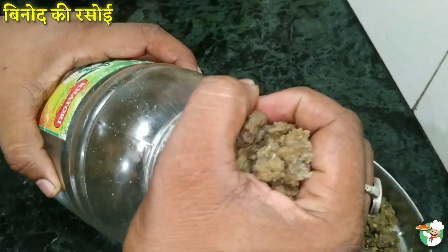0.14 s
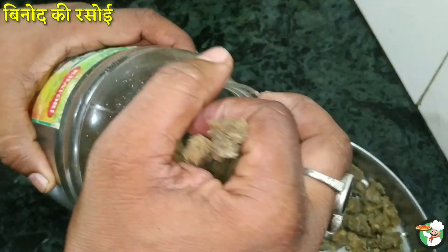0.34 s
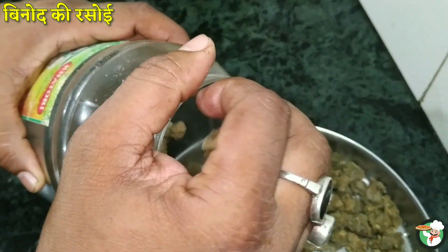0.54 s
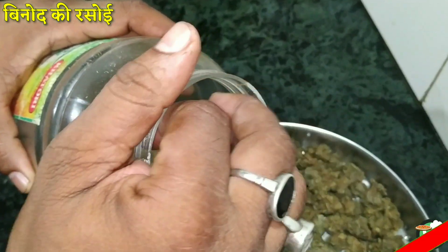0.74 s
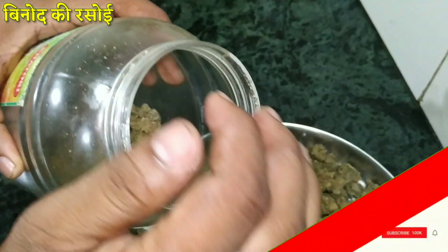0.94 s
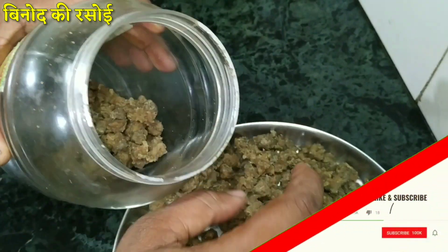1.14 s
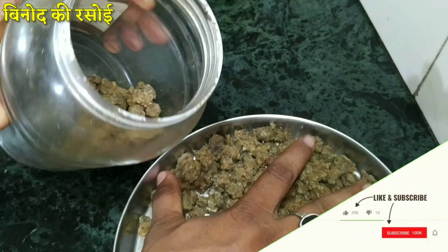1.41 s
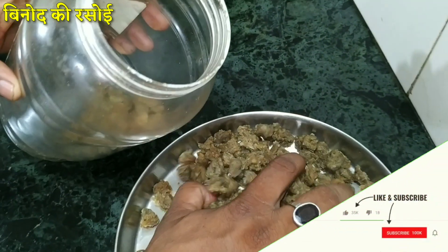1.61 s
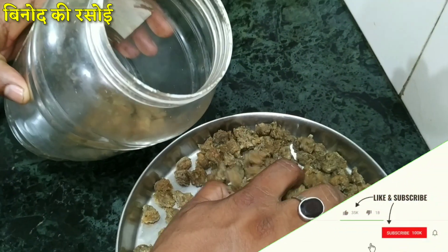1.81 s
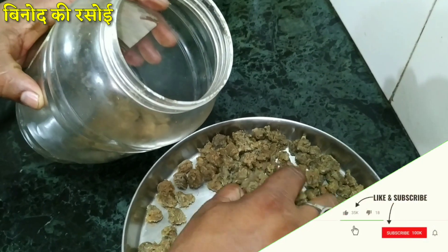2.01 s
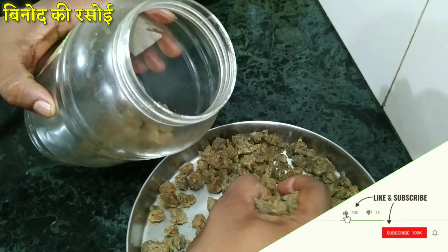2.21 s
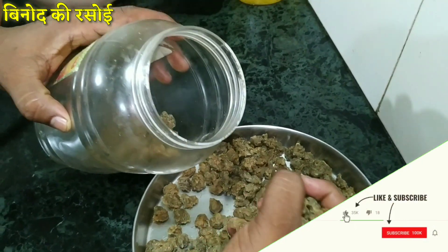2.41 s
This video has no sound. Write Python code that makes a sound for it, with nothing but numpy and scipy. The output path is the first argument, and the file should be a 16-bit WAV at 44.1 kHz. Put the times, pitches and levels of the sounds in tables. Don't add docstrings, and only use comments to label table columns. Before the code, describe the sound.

Dry hard pieces clatter into a hollow plastic jar, then rattle brightly on a steel plate

```python
import sys
import numpy as np
from scipy import signal
from scipy.fft import rfft, irfft, next_fast_len
from scipy.io import wavfile
from scipy.ndimage import uniform_filter1d

SR = 44100
rng = np.random.default_rng(int(sys.argv[2]) if len(sys.argv) > 2 else 0)


def gain_from_db(level_db):
    decades = np.asarray(level_db, float) / 20
    return 10 ** decades


def transcribe(u):
    v = np.clip(np.atleast_2d(u).T, -1, 1)
    q = np.round(v * 32767).astype(np.int16)
    wavfile.write(sys.argv[1], SR, q)


N = 112454

JAR_LAG_S, PLATE_LAG_S, LAG_SPREAD_S = -.00023, .00007, .00015
JAR_RISE_S, PLATE_RISE_S = .0002, .0015
MEAN_BRIGHT_DB, SMALL_BRIGHT_DB = -17.5, 1.5


def rms_one(x):
    return x / np.sqrt(np.mean(x ** 2) + 1e-20)


def in_time(curves):
    t = np.arange(N) / SR
    levels = [np.interp(t, *np.transpose(rows), left=-120, right=-120) for rows in curves]
    return np.max(levels, axis=0)


def at_hz(points, hz):
    point_hz, point_db = np.transpose(points)
    return np.interp(np.log(hz), np.log(point_hz), point_db)


def ring(clicks, hz, t60):
    radius = gain_from_db(-60 / (t60 * SR))
    angle = 2 * np.pi * hz / SR
    return signal.lfilter([0, np.sin(angle)], [1, -2 * radius * np.cos(angle), radius ** 2], clicks + 1e-18)


def place(s, gain, pan_db, lag_s):
    out = np.zeros((2, N))
    for ch, sign in enumerate((1, -1)):
        at = ((s + sign * lag_s / 2) * SR).astype(int)
        np.add.at(out[ch], np.clip(at, 0, N - 1), gain * gain_from_db(sign * pan_db / 2))
    return out


def flurries(s, db, rise_s, burst_s, count=48):
    burst_s = np.clip(burst_s, .002, .04)[:, None]
    late = 2.7 * burst_s * rng.random((len(s), count)) ** 1.8
    gain = gain_from_db(db)[:, None] * np.exp(-late / burst_s) * (1 - np.exp(-late / rise_s))
    owner = np.repeat(np.arange(len(s)), count)
    return (s[:, None] + late).ravel(), gain.ravel(), owner


def crowd(level_db, per_s, spread_db):
    born = rng.random(N) < per_s / SR
    sizes = gain_from_db(spread_db * np.minimum(rng.exponential(1, N), 4)) * rng.choice([-1, 1], N)
    at = np.flatnonzero(born)
    return at / SR, rms_one(sizes * born)[at] * gain_from_db(level_db[at])


def crowd_groups(s):
    return 40 + (s * 50).astype(int)


def body(s, gain, bright_db, low_db, group, pan_db, lag_s, colour, cycles, count=64):
    pitches = np.geomspace(520, 15500, count) * rng.uniform(.985, 1.015, count)
    lags = lag_s + LAG_SPREAD_S * rng.standard_normal(200)[group]
    patch_db = 1.4 * rms_one(uniform_filter1d(rng.standard_normal((200, count)), size=4, axis=1))
    t60 = cycles / pitches + .009
    weights = gain_from_db(at_hz(colour, pitches)) * np.sqrt(pitches / t60)
    weights = weights / np.sqrt(np.sum(weights ** 2 * t60) * SR / 27.6)
    out = 0
    for k, hz in enumerate(pitches):
        treble_db = bright_db * np.clip(np.log2(hz / 2500), 0, 1)
        bass_db = low_db * np.clip(2 * np.log2(1800 / hz), 0, 1)
        strike = gain * gain_from_db(treble_db + bass_db + patch_db[group, k]) * rng.standard_normal(len(s))
        out = out + ring(place(s, weights[k] * strike, pan_db, lags), hz, t60[k])
    return out


def snaps(rows, pan_db, lag_s, count=300):
    s, db, bright_db = np.transpose(rows)[:, :, None]
    late = np.arange(count) / SR
    envelope = np.exp(-late / .0019) * (1 - np.exp(-late / (2 * JAR_RISE_S)))
    crack = rng.standard_normal((len(s), count)) * envelope
    lags = lag_s + LAG_SPREAD_S * rng.standard_normal(s.shape)
    out = 0
    for band_hz, band_db in (([1350, 3200], db + 4.5), ([3200, 7200], db + bright_db + 7)):
        band = signal.butter(2, band_hz, "band", fs=SR, output="sos")
        out = out + signal.sosfilt(band, place(s + late, crack * gain_from_db(band_db), pan_db, lags))
    return out


def low_cut(x, hz):
    return signal.sosfilt(signal.butter(6, hz, "high", fs=SR, output="sos"), x)


def uncovered(s, before_db, after_db):
    hand_off_s, hand_move_s = 0.92, .04
    return before_db + (after_db - before_db) * (.5 + .5 * np.tanh((s - hand_off_s) / hand_move_s))


def tumbling():
    # time in seconds, level in dB.
    pour = [
        [(.205, -22.5), (.28, -16), (.35, -14), (.52, -15.5), (.63, -20), (.69, -21)],
        [(.69, -24.5), (.79, -28.5), (.88, -26.5), (.95, -24), (1.0, -40), (1.1, -39), (1.2, -60)],
    ]
    return crowd(in_time(pour) - 3.5, per_s=1500, spread_db=3.0)


def jar_wall(tumble_s, tumble_gain):
    # start in seconds, peak in dB, brightness in dB, body in dB.
    landings = [(0.2063, -2.5, -19, -25), (0.2279, -6.5, -16, -18), (0.2483, -2, -29, -12),
                (0.2638, -2.5, -22.5, -22), (0.272, -0.5, -19, -15.5), (0.2992, -7, -13, -27),
                (0.347, -3, -18, -16), (0.3654, -7, -11, -18), (0.4038, 0, -19, -25),
                (0.4179, -3, -16, -25), (0.4484, -8.5, -24, -10), (0.4684, 0, -18.5, -32),
                (0.5401, 1, -14.5, -22), (0.5969, -3.5, -12.5, -20.5), (0.64, -2, -9, -24),
                (0.6564, -14, -25, -13), (0.7067, -6.5, -12, -31), (0.724, -3.5, -16, -24),
                (0.7766, -8.5, -19, -19.5), (0.8049, -3.5, -10.5, -21), (0.8316, -8, -14, -27),
                (0.8999, -9.5, -9, -10), (0.9325, -21.5, -6, -14), (0.9724, -25, -8.5, -10),
                (1.0122, -18, -15.5, -19), (1.0643, -13, -16, -17), (1.1253, -22, -28, -18.5),
                (1.198, -23.5, -23, -27), (1.254, -15, -14, -11)]
    # frequency in Hz, level in dB per Hz.
    wall_colour = [(500, -16), (561, -21.5), (941, -10), (1670, -9.5), (2230, -4.5), (3060, -12),
                   (4000, -9), (5350, -18.5), (15500, -47.5)]
    s, db, bright_db, low_db = np.transpose(landings)
    land_s, land_gain, owner = flurries(s, db + 5, JAR_RISE_S, np.full(len(s), .0055))
    small = np.zeros(len(tumble_s))
    all_s = np.r_[land_s, tumble_s]
    return body(all_s, np.r_[land_gain, tumble_gain],
                bright_db=np.r_[bright_db[owner] - MEAN_BRIGHT_DB, small + SMALL_BRIGHT_DB],
                low_db=np.r_[low_db[owner] + 19.5, small],
                group=np.r_[owner, crowd_groups(tumble_s)],
                pan_db=uncovered(all_s, -1.3, 2), lag_s=JAR_LAG_S, colour=wall_colour, cycles=39)


def jar_boom(tumble_s, tumble_gain):
    # start in seconds, peak in dB, upper modes in dB.
    thumps = [(0.207, -34, 11.5), (0.28, -19, -1), (0.346, -3.5, -9), (0.375, -9.5, -9.5),
              (0.434, -11, -16), (0.469, -13.5, -10), (0.51, -18.5, -1), (0.544, -16.5, 1),
              (0.59, -14.5, -5.5), (0.632, -16, 0.5), (0.699, -28.5, 14), (0.773, -26.5, 6),
              (0.87, -29, -17), (0.935, -8.5, -9.5), (0.969, -13, -14), (1.017, -15.5, -9.5),
              (1.063, -20, 2), (1.257, -28.5, -26)]
    # frequency in Hz, level in dB, t60 in seconds.
    low_modes = [(192, -14, 0.43), (239, -3, 0.11), (282, -15, 0.084), (391, -6, 0.033), (507, -16, 0.071),
                 (708, -12.5, 0.051), (948, -10, 0.042), (1140, -35, 0.038), (1260, -34, 0.097),
                 (1496, -20, 0.067), (1798, -9.5, 0.05)]
    thump_s, thump_db, upper_db = np.transpose(thumps)
    all_s = np.r_[thump_s, tumble_s]
    pan_db = uncovered(all_s, -3, 0)
    filling = np.clip(10 * (tumble_s - 0.23), .1, 1)
    out = 0
    for hz, db, t60 in low_modes:
        mode_db = (upper_db + 5.5 + 1.85 * rng.standard_normal(len(thump_s))) * (hz > 330)
        thump = gain_from_db(thump_db + 2.5 + mode_db)
        stir = tumble_gain * gain_from_db(-23) * filling * rng.standard_normal(len(tumble_s))
        out = out + gain_from_db(db) * ring(place(all_s, np.r_[thump, stir], pan_db, JAR_LAG_S), hz, t60)
    return out


def jar_cracks():
    # start in seconds, peak in dB, brightness in dB.
    wall_snaps = [(0.2072, -7.5, -17), (0.2174, -12, -28), (0.2284, -9, -14), (0.2479, 0, -11),
                  (0.2641, -6.5, -20), (0.3028, -2, -22), (0.3459, -3, -24), (0.3671, -2.5, -8),
                  (0.392, -7, -15), (0.4033, -5, -25), (0.4187, -4, -22), (0.4243, -8, -23),
                  (0.4729, -5, -24), (0.5438, 0, -16.5), (0.5769, -16, -23), (0.5972, -4.5, -29),
                  (0.6052, -13, -28), (0.6413, -2.5, -14), (0.7081, -4, -13), (0.7259, -1.5, -16),
                  (0.7347, -17, -24), (0.7773, -9, -9), (0.8066, -8, -5.5), (0.8173, -13, -19),
                  (0.8331, -4, -13.5), (0.8374, -11, -20), (0.9012, -6, -18), (0.9534, -25, -12),
                  (0.9736, -17, -16), (1.0163, -19, -14), (1.0367, -34, -16), (1.0586, -24, -10),
                  (1.0664, -16, -17.5), (1.1259, -27, -18), (1.1342, -39, -19), (1.1995, -31, -21),
                  (1.2558, -25, -26), (1.2604, -37, -32)]
    return snaps(wall_snaps, 0.71, JAR_LAG_S)


def plate():
    # time in seconds, level in dB.
    strokes = [
        [(0, -38.5), (.03, -35), (.11, -44.5), (.19, -36)],
        [(1.4, -42), (1.45, -43), (1.53, -25.5), (1.62, -15), (1.72, -15.5), (1.79, -21)],
        [(1.79, -22.5), (1.84, -15.5), (1.88, -16), (1.96, -15), (2.0, -20), (2.04, -23.5)],
        [(2.04, -16), (2.1, -17.5), (2.16, -15.5), (2.2, -21.5), (2.31, -33.5), (2.4, -45), (2.55, -51)],
    ]
    # start in seconds, peak in dB, brightness in dB, length in seconds.
    knocks = [(0.0185, -16.5, -23, 0.0085), (1.41, -22, -3.5, 0.0095), (1.427, -15.5, -11.5, 0.014),
              (1.468, -17, -14, 0.016), (1.497, -9, -25, 0.011), (1.5446, -4.5, -17.5, 0.013),
              (1.61, -9, -15, 0.013), (1.626, -11, -15, 0.013), (1.677, -16, -7, 0.015),
              (1.73, -15, -6, 0.013), (1.8646, -6.5, -8.5, 0.016), (1.891, -2.5, -13.5, 0.013),
              (1.922, -6, -12, 0.014), (1.9747, -3, -14.5, 0.016), (2.057, -4, -19, 0.011),
              (2.083, -21, 1, 0.011), (2.142, -8.5, -7, 0.014), (2.1683, -21, 4.5, 0.016),
              (2.209, -14.5, -8, 0.01), (2.262, -13.5, -12, 0.011), (2.326, -11.5, -16, 0.011),
              (2.358, -13.5, -10, 0.013), (2.4307, -18.5, -21, 0.016), (2.494, -37, -24, 0.014),
              (2.5444, -20, -32, 0.016)]
    # frequency in Hz, level in dB per Hz.
    steel_colour = [(500, -62), (1370, -14), (1530, -11.5), (2610, 0), (3150, -6.5), (3900, -5),
                    (10700, -22.5), (15500, -35.5)]
    s, db, bright_db, length_s = np.transpose(knocks)
    knock_s, knock_gain, owner = flurries(s, db + 3.5, PLATE_RISE_S, length_s)
    rake_s, rake_gain = crowd(in_time(strokes) - 3.0, per_s=4000, spread_db=1.77)
    small_bright_db = np.full(len(rake_s), SMALL_BRIGHT_DB)
    return body(np.r_[knock_s, rake_s], np.r_[knock_gain, rake_gain],
                bright_db=np.r_[bright_db[owner] - MEAN_BRIGHT_DB, small_bright_db], low_db=0,
                group=np.r_[owner, crowd_groups(rake_s)],
                pan_db=0.96, lag_s=PLATE_LAG_S, colour=steel_colour, cycles=28)


def plate_cracks():
    # start in seconds, peak in dB, brightness in dB.
    steel_snaps = [(1.4142, -17, -21), (1.4331, -23, -12), (1.4727, -24, -16), (1.5042, -24, -15),
                   (1.5111, -19, -23), (1.5229, -22, -19), (1.5453, -18, -11), (1.5544, -17, -13),
                   (1.5815, -11, -20), (1.6205, -5, -6), (1.6678, -7, -8), (1.7352, -14, 1),
                   (1.7405, -14, -4), (1.8117, -11, -22), (1.8587, -8, -12), (1.9319, -12, -3),
                   (1.9848, -5, -5.5), (2.061, -3, -4.5), (2.0962, -13.5, 1), (2.169, -9, -2),
                   (2.2115, -11, 3.5), (2.2159, -16, 0), (2.2377, -16, -9), (2.2551, -11, -18),
                   (2.2686, -14, -3), (2.274, -20, -4), (2.3112, -27, -19), (2.3265, -19, -10.5),
                   (2.3636, -15, -1), (2.3716, -19, -3), (2.4328, -18, -15), (2.4372, -27, -6),
                   (2.4671, -28, -2), (2.4893, -31, -8.5), (2.4937, -35, -11), (2.5464, -36, -15)]
    return snaps(steel_snaps, 1.4, PLATE_LAG_S)


def kitchen(x):
    t60_s, wall_cut_hz = 0.13, 14700
    size = next_fast_len(N + SR)
    w = 2 * np.pi * np.fft.rfftfreq(size)
    dull = 1 / (1 + 1j * w * SR / (2 * np.pi * wall_cut_hz))
    out = np.zeros((2, len(w)), complex)
    for k, lag in enumerate(rng.uniform(.006, .03, size=16) * SR):
        loop = gain_from_db(-60 * lag / SR / t60_s) * dull * np.exp(-1j * w * lag)
        out[k % 2] += loop / (1 - loop) * (-1) ** (k // 2)
    return irfft(out * rfft(x[0], size), size)[:, :N]


def room_tone():
    # frequency in Hz, level in dB.
    floor = [(15, -1), (25, -3.5), (666, -7), (1020, -10.5), (1170, -3.5), (1450, -12.5), (2120, -11),
             (3090, -15), (15500, -25)]
    # frequency in Hz, width in Hz, level in dB.
    hum = [(75, 7.4, -58.5), (205, 1.05, -55), (2020, 230, -74.5)]
    hz = np.maximum(np.fft.rfftfreq(N, 1 / SR), 1)
    mid, side = rfft(rng.standard_normal((2, N)))
    alike = np.clip(.7 - 0.27 * np.log2(np.maximum(hz / 250, 1)), 0, .99)
    white = np.sqrt(1 + alike) * mid + np.sqrt(1 - alike) * side * np.array([[1], [-1]])
    out = gain_from_db(-44.5) * rms_one(irfft(white * gain_from_db(at_hz(floor, hz)), N))
    for centre_hz, width_hz, db in hum:
        resonance = 1 / (1 + (2 * (hz - centre_hz) / width_hz) ** 2)
        out = out + gain_from_db(db) * rms_one(irfft(white * resonance, N))
    return out


def scene():
    tumble_s, tumble_gain = tumbling()
    jar = jar_wall(tumble_s, tumble_gain) + jar_boom(tumble_s, tumble_gain)
    near = low_cut(jar, 242) + low_cut(plate(), 640)
    near = near + jar_cracks() + plate_cracks()
    return near + gain_from_db(-10.5) * kitchen(low_cut(near, 645)) + room_tone()


def low_pass(x):
    return signal.sosfilt(signal.butter(12, 16510, fs=SR, output="sos"), x)


def record(dry):
    # frequency in Hz, level difference in dB.
    mic_tilt = [(60, -1.5), (150, -1), (380, 0.5), (950, 1), (2380, 1.5), (5980, 1.5), (15000, -10)]
    port_hz, port_width_hz, port_db = 2070, 427, 5.5
    hz = np.maximum(np.fft.rfftfreq(N, 1 / SR), 1)
    port = 1 + (gain_from_db(port_db) - 1) / (1 + 1j * (hz ** 2 - port_hz ** 2) / (hz * port_width_hz))
    tilt = gain_from_db(at_hz(mic_tilt, hz) * np.array([[.5], [-.5]]))
    x = irfft(rfft(dry) * port * tilt, N)
    rounded = .85 * np.tanh(x / .85)
    mix = signal.sosfilt(signal.cheby2(12, 70, 16600, fs=SR, output="sos"), rounded)
    return low_pass(mix)


dry = scene()
out = record(dry)
transcribe(out)
```